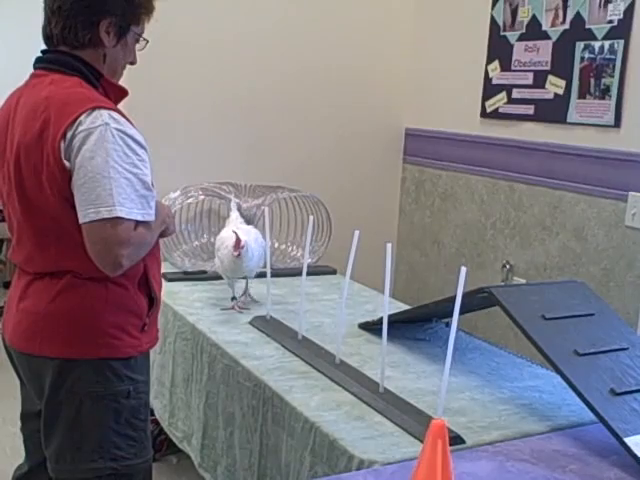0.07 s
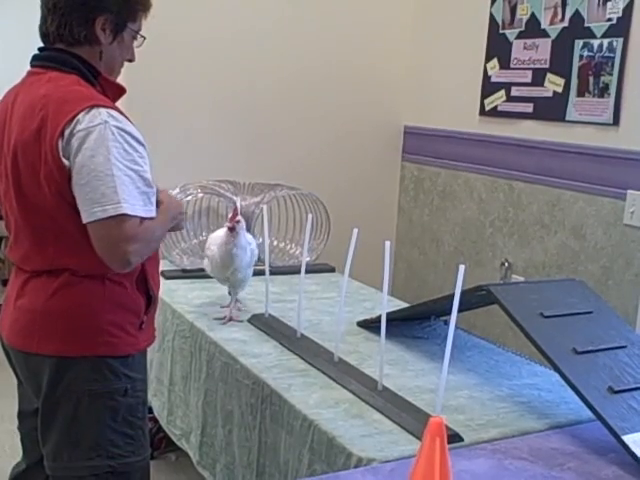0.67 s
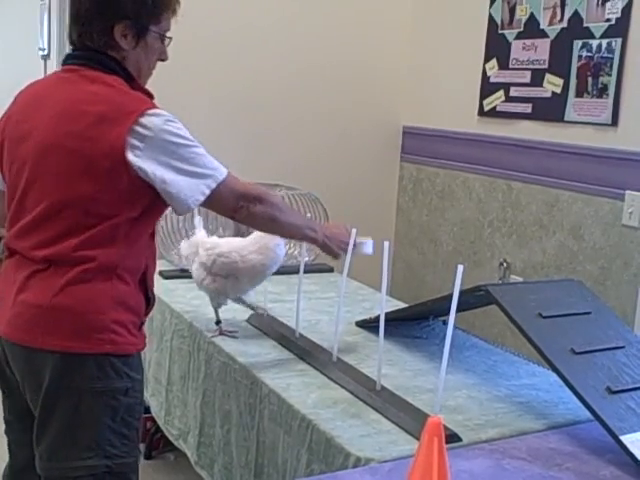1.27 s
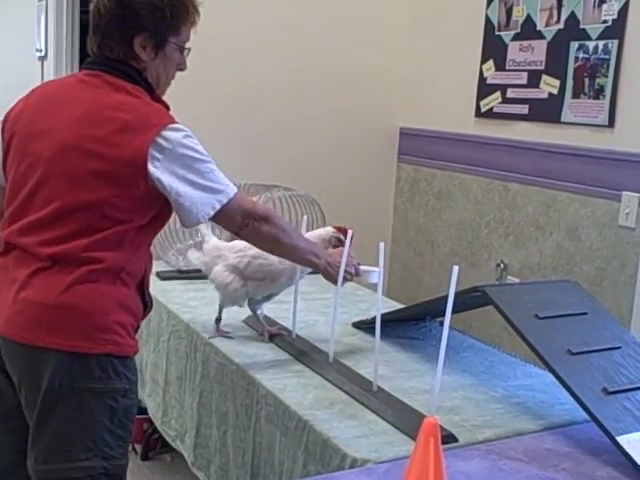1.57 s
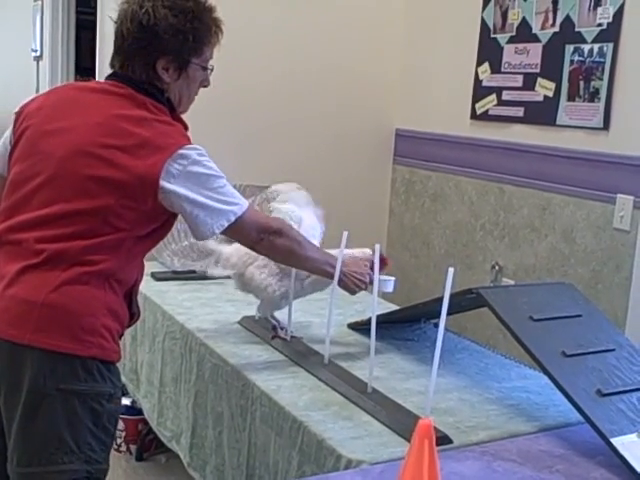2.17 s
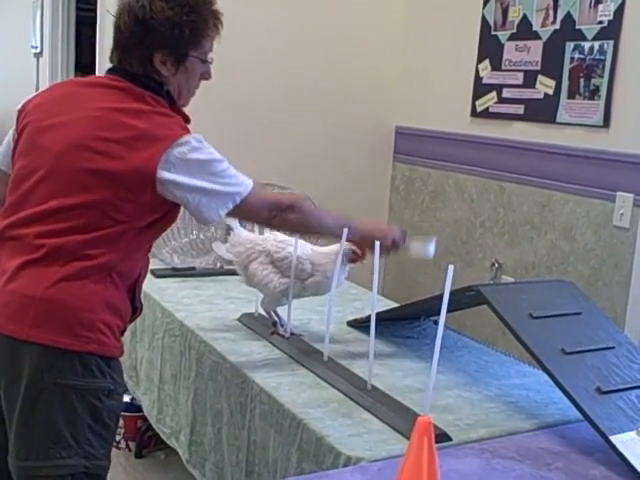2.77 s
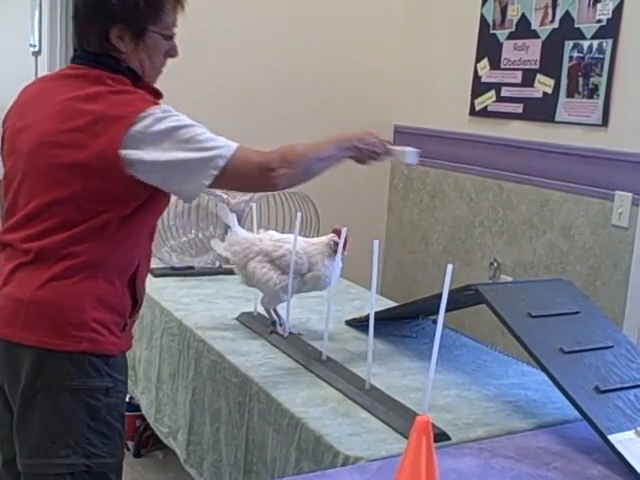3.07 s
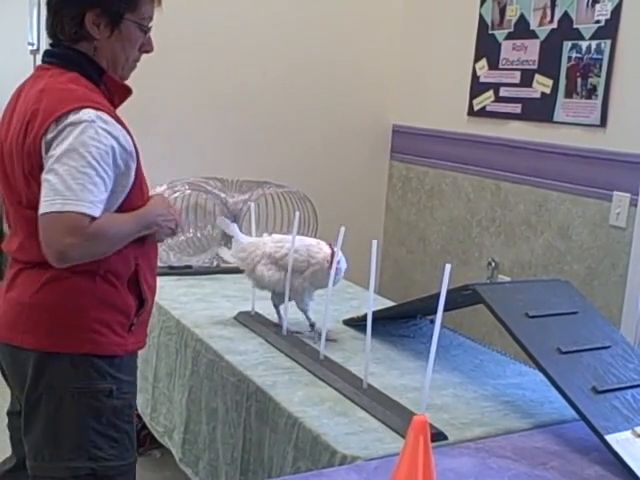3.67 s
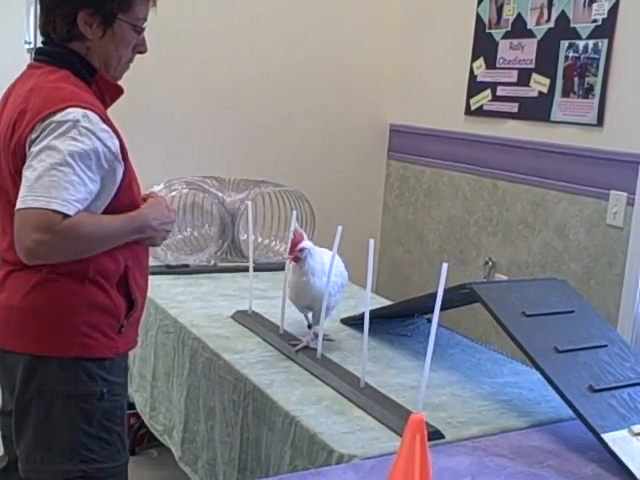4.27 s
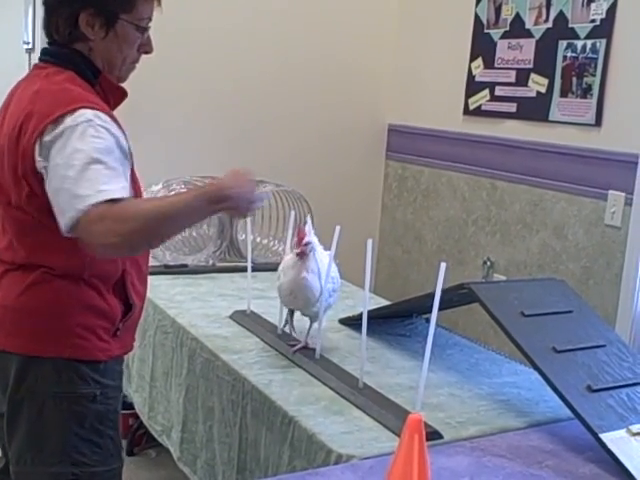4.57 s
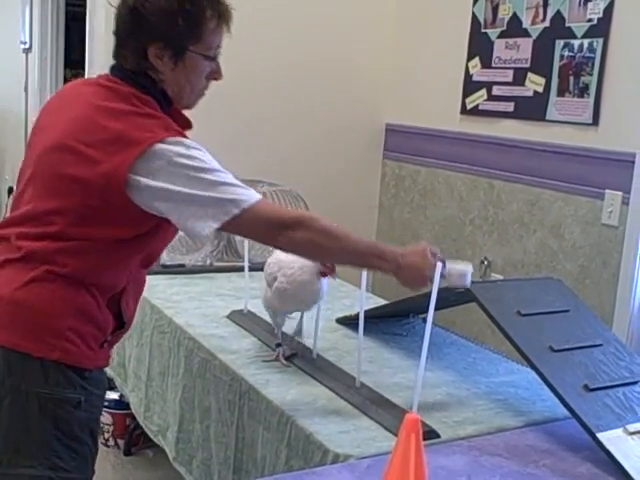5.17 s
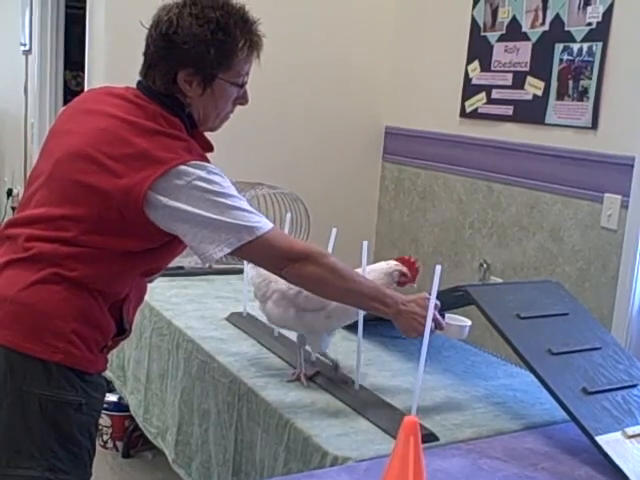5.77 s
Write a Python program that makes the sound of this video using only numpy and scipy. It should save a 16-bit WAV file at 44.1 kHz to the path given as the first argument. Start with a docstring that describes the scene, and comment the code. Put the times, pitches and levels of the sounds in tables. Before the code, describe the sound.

In a quiet, slightly echoing room with softly rushing air, a training clicker snaps down and springs back. Light claw taps lead to a small knock, a slap of feathers and a heavy landing as a hen comes down on a table. She pecks a plastic cup several times and the grain slides. The clicker snaps twice again, standing out clearly above the faint steps, rustles and soft pecks that follow.

```python
"""A hen is trained to weave through poles on a cloth-covered table in a bare room with softly rushing air.
Her feet pad and tick, and early on the steel tongue of a hand clicker snaps down and springs back.
Near two seconds she knocks a pole, beats a wing and lands heavily, then pecks grain from a plastic cup.
Just after four seconds the clicker snaps again; gentler pecks, sliding grain and a few steps follow."""
import sys
import numpy as np
from scipy import signal
from scipy.fft import rfft, irfft, next_fast_len
from scipy.io import wavfile

SR = 44100
rng = np.random.default_rng(int(sys.argv[2]) if len(sys.argv) > 2 else 0)


def output_pcm(signal):
    """Save a mono or channel-first signal as 16-bit PCM at the path in sys.argv[1].

    Samples are clipped to [-1, 1] before scaling.
    """
    pcm = np.clip(np.atleast_2d(signal).T, -1, 1) * 32767
    wavfile.write(sys.argv[1], SR, np.round(pcm).astype(np.int16))


N = 264644

# The clicker is pressed and let go; the trainer's body shades the first pair. More tilt is brighter.
# Columns: start_s, level_db, direct_gain_db, direct_tilt_db_per_octave
CLICKER_PRESSES = [(.6279, -27, -1.5, -2), (4.1494, -26, 1.5, 0)]
CLICKER_RELEASES = [(.7683, -28.5, 0.5, -1.2), (4.3267, -28.5, 5.5, 0.74)]
# The steel tongue rings higher when bent than when relaxed: pitch_hz, width_hz, gain_db
BENT_TONGUE_RINGS = [(1640, 820, -16), (2904, 650, -9), (4040, 200, -0.5), (5170, 1030, -14),
                     (7230, 830, -18), (9080, 800, -20), (11900, 1530, -22.5), (14900, 2500, -28)]
RELAXED_TONGUE_RINGS = [(1763, 427, -6), (2240, 221, 2.5), (2576, 131, 3), (3648, 106, -0.5),
                        (4540, 415, -4.5), (7850, 560, -16.5), (9490, 730, -19), (14100, 2700, -40.5)]

# The hen steps on the poles' base board: start_s, level_db, tilt_db_per_octave
FOOTSTEPS = [(.464, -50, 2), (1.069, -47.5, 7.5), (1.68, -57.5, 8), (1.715, -58.5, 4), (3.757, -51, -3),
             (4.405, -55.5, 3), (4.866, -57, -3), (5.449, -46.5, -1), (5.68, -60, 5)]
# She knocks a pole, beats a wing and lands hard: start_s, level_db, length_s, tilt_db_per_octave
POLE_KNOCKS = [(1.967, -48, 0.012, -1.5), (1.988, -43.5, 0.0043, -2)]
WING_BEAT = [(2.118, -44.5, 0.0056, -14), (2.124, -32.5, 0.0036, -0.5)]
HARD_LANDING = [(2.123, -26, 0.013, 0.5), (2.143, -32, 0.0037, -1)]
# The beak strikes the cup: start_s, level_db, length_s
BEAK_PECKS = [(2.282, -31, 0.015), (2.318, -41.5, 0.01), (2.385, -47.5, 0.018), (2.592, -39, 0.0045),
              (4.863, -58.5, 0.0023), (5.679, -54.5, 0.0062)]
# Grain slides as the cup is moved: start_s, level_db
GRAIN_SLIDES = [(2.561, -46.5), (4.812, -58), (4.95, -61), (5.05, -62.5)]
# How each thing rings when it is struck: pitch_hz, width_hz, gain_db
BOARD_RINGS = [(170, 38, 1), (272, 66, -1.5), (426, 78, 2.5), (653, 100, 2), (876, 177, -4.5),
               (1288, 660, -17), (2030, 740, -22.5)]
POLE_RINGS = [(815, 89, -2.5), (930, 41, -4.5), (1070, 150, -11.5), (2030, 320, -16.5), (3700, 2400, -24)]
FEATHER_RINGS = [(2058, 3500, -3.5), (4450, 1500, 4.5), (7850, 3000, 3), (13200, 6600, -4)]
TABLE_RINGS = [(60, 34, -11.5), (119.2, 16, -1.5), (172, 29, 4), (230, 39, -40), (410, 73, -2.5),
               (538, 25, -7), (638, 88, -2.5), (766, 150, -30), (1250, 150, -18), (2030, 900, -47)]
CUP_RINGS = [(1575, 67, 2), (1840, 232, 1.5), (2140, 410, -6), (3505, 250, 1.5), (5440, 2400, -9),
             (8000, 5100, -10), (14040, 2800, -19.5)]

# Light taps of claw and beak, and sharp ticks: start_s, level_db, pitch_hz
LIGHT_TAPS = [(1.228, -64.5, 2070), (3.084, -62, 1880), (3.483, -55.5, 2430), (3.663, -58, 1500),
              (3.967, -54.5, 1708), (4.651, -54.5, 1830), (5.667, -58, 1400)]
SHARP_TICKS = [(1.777, -48.5, 14800), (1.916, -60, 10400), (2.956, -52.5, 9300), (4.035, -54.5, 11550),
               (5.415, -59.5, 8500)]
# Feathers and cloth rustle: start_s, level_db, length_s, pitch_hz
SOFT_RUSTLES = [(1.655, -61, 0.024, 1685), (1.779, -57.5, 0.048, 11900), (3.213, -66, 0.0065, 6500),
                (3.32, -65, 0.073, 14000), (3.485, -63.5, 0.0069, 12900), (3.945, -60, 0.024, 2600),
                (5.42, -60.5, 0.084, 6700), (5.681, -55, 0.0078, 4100), (5.861, -61.5, 0.013, 9900)]
# Soft bumps through the table: start_s, level_db, length_s
TABLE_BUMPS = [(1.412, -64, 0.0051), (1.79, -52, 0.049), (1.924, -53, 0.07), (3.016, -63.5, 0.0029),
               (4.213, -47, 0.014), (5.875, -58, 0.037)]

# Echoes from the table top, floor and near walls: delay_s, gain_db
NEAR_ECHOES = [(.0037, -22), (.0076, -16), (0.0109, -5), (0.013, -11), (.0195, -9.5)]
# How long the room takes to fade by 60 dB: pitch_hz, fade_s
ROOM_FADE_TIMES = [(150, 0.66), (400, 0.84), (1000, 0.84), (2500, 0.58), (4500, 0.74), (8000, 0.34),
                   (15000, 0.42)]
# The ventilation's rush, from bass to treble: pitch_hz, relative_level_db
AIR_SPECTRUM = [(12, -56.5), (20, 0.5), (86, -2), (262, -11), (410, -12), (527, -16.5), (642, -16.5),
                (1120, -21), (2080, -23.5), (2910, -25.5), (5680, -27.5), (6180, -27), (8180, -29.5),
                (14700, -30.5), (16000, -30.5)]
# Two machine tones, one low and one high: pitch_hz, width_hz, level_db
LOW_HUM = [(72.2, 10, -69)]
THIN_WHINE = [(6150, 49, -83.5)]
# The low hum slowly sinks: time_s, gain_db
HUM_FADE = [(0, 2), (.8, 0), (2.8, -1), (4.4, -1.5), (6, -8)]


def clicker(snaps, rings, low_cut_hz, hand_s, hand_db):
    """The steel tongue flips in one instant and rings briefly; the tiny box gives off little bass."""
    t, out = np.arange(SR // 20) / SR, np.zeros(N)
    flip = signal.unit_impulse(len(t))
    bass_cut = signal.butter(2, low_cut_hz, "high", fs=SR, output="sos")
    snap = signal.sosfilt(bass_cut, resonate(flip, rings))
    lowest_hz = rings[0][0]
    for start_s, level_db, direct_db, tilt_db in snaps:
        # hand and sleeve scatter the direct sound over a millisecond or two
        scatter = unit_energy(rng.standard_normal(len(t)) * t * np.exp(-t / hand_s))
        direct = signal.fftconvolve(snap, flip + from_db(hand_db) * scatter)
        # the direct sound's treble is tilted per snap; the trainer's body shades it for the first pair
        direct = shape_tone(direct, lambda hz: tilt_db * np.log2(np.maximum(hz, lowest_hz)))
        add(out, start_s, direct, level_db + direct_db)
        into_room = np.zeros(N)
        add(into_room, start_s, snap, level_db)
        out += room(into_room)
    return out


def hen():
    """Her feet scuff the board, she knocks a pole, and she thuds onto the table with a slap of feathers."""
    scuff_s = 0.012
    footfalls = [(start_s, db, scuff_s, tilt_db) for start_s, db, tilt_db in FOOTSTEPS]
    steps = strikes(footfalls, BOARD_RINGS, hits_per_s=1200, push_s=0.00035, push_db=0, room_db=-1.5)
    pole = strikes(POLE_KNOCKS, POLE_RINGS, hits_per_s=390, push_s=0.00022, push_db=10.5, room_db=0)
    thud = strikes(HARD_LANDING, TABLE_RINGS, hits_per_s=1400, push_s=0.0003, push_db=3, room_db=-5.5)
    wing = strikes(WING_BEAT, FEATHER_RINGS, hits_per_s=3400, push_s=0.0005, push_db=-12, room_db=-7)
    return steps + pole + thud + wing


def grain_cup():
    """Short pecks and longer slides of grain ring the same cup; gentle ones sound duller."""
    slide_s, firm_db = 0.036, -51.5
    slides = [(start_s, db, slide_s) for start_s, db in GRAIN_SLIDES]
    touches = []
    for start_s, level_db, length_s in list(BEAK_PECKS) + slides:
        tilt_db = 0.9 - 0.3 * max(firm_db - level_db, 0)   # less treble for each dB below a firm touch
        touches.append((start_s, level_db, length_s, tilt_db))
    return strikes(touches, CUP_RINGS, hits_per_s=1400, push_s=0.00001, push_db=-8.5, room_db=-6)


def small_sounds():
    """Claws and beak tap and tick, feathers and cloth rustle, and the table bumps softly."""
    taps = [(start_s, db, 0.006, hz) for start_s, db, hz in LIGHT_TAPS]   # 6 ms long
    ticks = [(start_s, db, 0.0015, hz) for start_s, db, hz in SHARP_TICKS]   # 1.5 ms long
    bumps = [(start_s, db, length_s, 187) for start_s, db, length_s in TABLE_BUMPS]   # all at 187 Hz
    return (light_touches(taps, width_share=0.6, crisp_db=-13.5, hits_per_s=3200, room_db=-1)
            + light_touches(ticks, width_share=0.93, crisp_db=0, hits_per_s=4400, room_db=-7)
            + light_touches(SOFT_RUSTLES, width_share=1, crisp_db=-27.5, hits_per_s=2300, room_db=-4.5)
            + light_touches(bumps, width_share=0.66, crisp_db=-28.5, hits_per_s=3200, room_db=-3))


def strikes(events, rings, hits_per_s, push_s, push_db, room_db):
    """Each strike is one smooth push plus many tiny hits, all ringing the same object."""
    t, direct = np.arange(SR // 3) / SR, np.zeros(N)
    push = t * np.exp(-t / push_s)   # a softer touch lasts longer and sounds duller
    low_hz, high_hz = rings[0][0], rings[-1][0]
    for start_s, level_db, length_s, tilt_db in events:
        force = from_db(push_db) * push / push.sum() + tiny_hits(length_s, hits_per_s)
        ringing = resonate(force, rings)
        sound = shape_tone(ringing, lambda hz: tilt_db * np.log2(np.clip(hz, low_hz, high_hz)))
        add(direct, start_s, sound, level_db)
    return direct + from_db(room_db) * room(direct)


def light_touches(events, width_share, crisp_db, hits_per_s, room_db):
    """Each touch makes one broad ring that dies fast, with the crisp sound of the bare hits on top."""
    direct = np.zeros(N)
    for start_s, level_db, length_s, pitch_hz in events:
        ring = [(pitch_hz, width_share * pitch_hz, 0)]
        force = tiny_hits(length_s, hits_per_s)
        ringing = unit_energy(resonate(resonate(force, ring), ring))
        add(direct, start_s, ringing + from_db(crisp_db) * force, level_db)
    return direct + from_db(room_db) * room(direct)


def tiny_hits(length_s, hits_per_s, spread_db=3, rise_share=0.25):
    """A shower of tiny hits of uneven size that builds up quickly and dies away."""
    t = np.arange(1, SR // 3 + 1) / SR
    sizes = from_db(spread_db * np.clip(rng.standard_normal(len(t)), -2, 2))
    signs = rng.choice([-1, 1], len(t))
    hits = rng.random(len(t)) < hits_per_s / SR
    rise = 1 - np.exp(-t / (rise_share * length_s))
    return unit_energy(sizes * signs * hits * rise * np.exp(-t / length_s))


def resonate(force, rings):
    """A struck object rings at several pitches at once; the wider a ring, the sooner it dies."""
    out = 0
    for k, (pitch_hz, width_hz, gain_db) in enumerate(rings):
        decay, angle = np.exp(-np.pi * width_hz / SR), 2 * np.pi * pitch_hz / SR   # per sample
        ring = signal.lfilter([1, 0, -1], [1, -2 * decay * np.cos(angle), decay ** 2], force + 1e-18)
        gain = from_db(gain_db) * (1 - decay ** 2) / 2
        out = out + (-1) ** k * gain * ring   # every second ring is flipped
    return out


def room(sound):
    """The room throws back a few clear echoes, scatter from furniture, and a tail that grows duller."""
    t = np.arange(SR) / SR
    build_up_s, scatter_fade_s, scatter_db, tail_db = 0.0064, 0.075, -0.5, -1.5
    edges_hz = np.geomspace(50, 18000, 15)
    tail = 0
    for low, high in zip(edges_hz, edges_hz[1:]):
        band_pass = signal.butter(2, [low, high], "band", fs=SR, output="sos")
        band = signal.sosfilt(band_pass, rng.standard_normal(SR))
        fade_s = at_hz(ROOM_FADE_TIMES, np.sqrt(low * high))
        tail = tail + band * from_db(-60 * t / fade_s)
    build_up = 1 - np.exp(-(t / build_up_s) ** 2)
    tail = tail * build_up / np.sqrt(0.04 * SR)
    scatter = unit_energy(rng.standard_normal(SR) * build_up * from_db(-60 * t / scatter_fade_s))
    echoes = from_db(tail_db) * tail + from_db(scatter_db) * scatter
    for delay_s, gain_db in NEAR_ECHOES:
        echoes[round(delay_s * SR)] += from_db(gain_db)
    return signal.fftconvolve(sound, echoes)[:N]


def ventilation():
    """Air rushes softly, with a slowly sinking hum and a thin whine from the machine."""
    rush = shape_tone(rng.standard_normal(N), lambda hz: at_hz(AIR_SPECTRUM, hz))
    air = from_db(-63) * unit_energy(rush)
    hum, whine = (from_db(db) * unit_energy(resonate(rng.standard_normal(N), [(hz, width_hz, 0)]))
                  for hz, width_hz, db in LOW_HUM + THIN_WHINE)
    fade = from_db(np.interp(np.arange(N) / SR, *np.transpose(HUM_FADE)))
    return np.sqrt(N) * (air + fade * hum + whine)


def from_db(db):
    """Turn decibels into a number to multiply by."""
    return 10 ** (np.asarray(db) / 20)


def unit_energy(sound):
    """Scale a sound so that its squared samples add up to one."""
    return sound / np.sqrt(np.sum(sound ** 2) + 1e-20)


def at_hz(table, hz):
    """Read between a table's rows, giving every octave the same space."""
    known_hz, values = np.transpose(table)
    return np.interp(np.log(np.maximum(hz, 1)), np.log(known_hz), values)


def shape_tone(sound, db_at):
    """Turn each pitch up or down by db_at(hz) decibels."""
    size = next_fast_len(2 * len(sound))
    gains = from_db(db_at(np.fft.rfftfreq(size, 1 / SR)))
    return irfft(rfft(sound, size) * gains, size)[:len(sound)]


def add(track, start_s, sound, level_db):
    """Mix a sound in; level_db is its level if its energy were spread over 10 ms."""
    start = round(start_s * SR)
    part = unit_energy(sound)[:N - start] * np.sqrt(SR / 100)
    track[start:start + len(part)] += from_db(level_db) * part


def scene():
    """Clicker, cup, hen and room air, mixed into one channel."""
    presses = clicker(CLICKER_PRESSES, BENT_TONGUE_RINGS, low_cut_hz=190, hand_s=0.002, hand_db=-2.5)
    releases = clicker(CLICKER_RELEASES, RELAXED_TONGUE_RINGS, low_cut_hz=260, hand_s=0.001, hand_db=-12)
    return (presses + releases + grain_cup() + hen() + small_sounds() + ventilation())[None]


def record(dry):
    """Treble above 15900 Hz is cut steeply."""
    return signal.sosfilt(signal.ellip(10, 0.1, 70, 15900, fs=SR, output="sos"), dry)


dry = scene()
out = record(dry)
output_pcm(out)
```